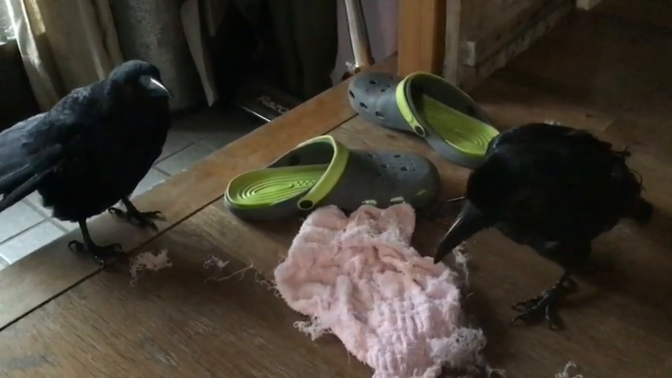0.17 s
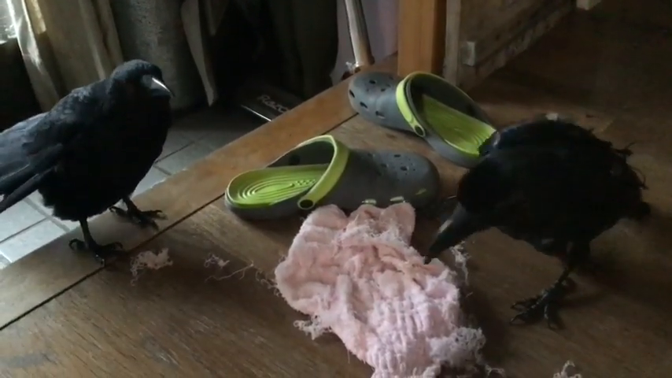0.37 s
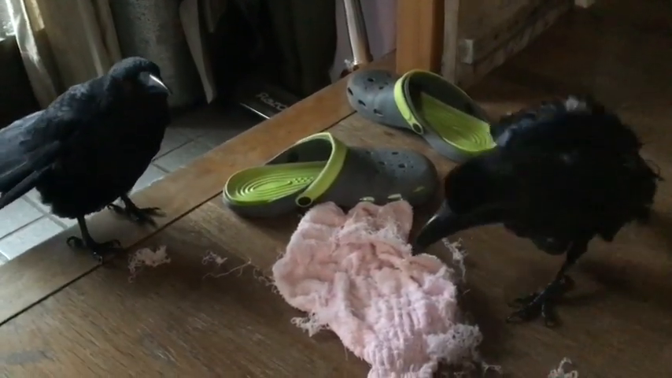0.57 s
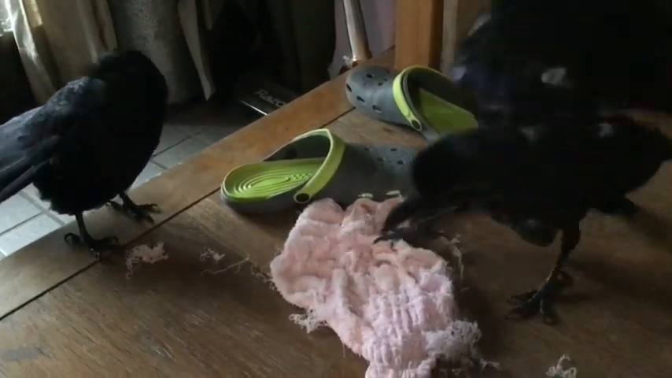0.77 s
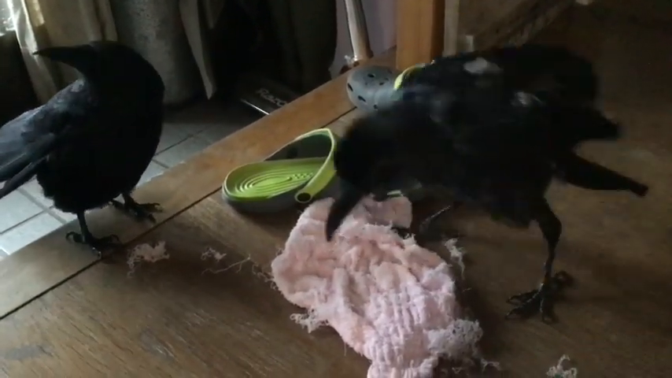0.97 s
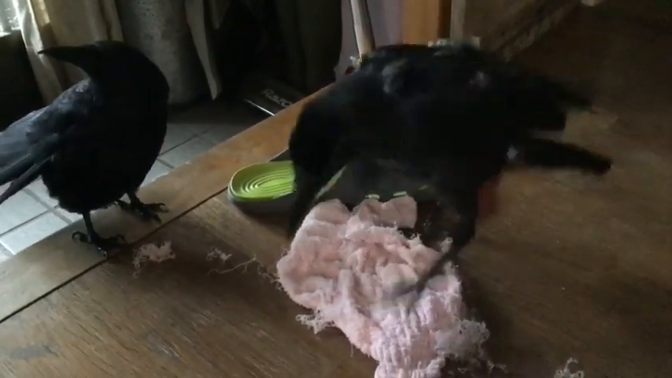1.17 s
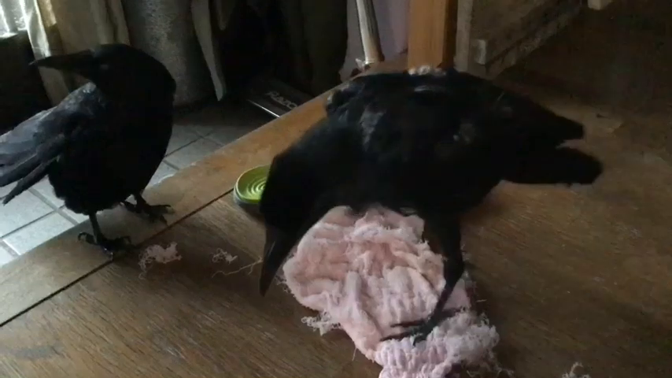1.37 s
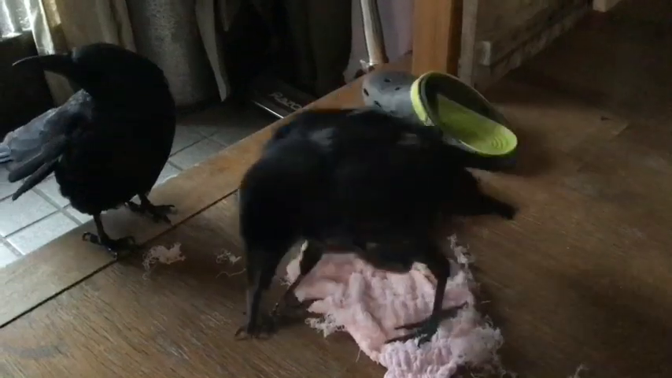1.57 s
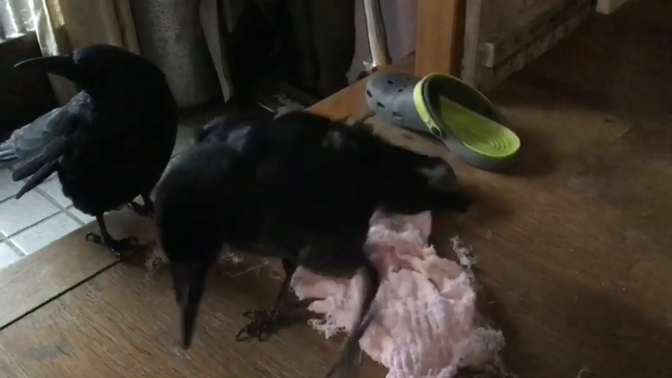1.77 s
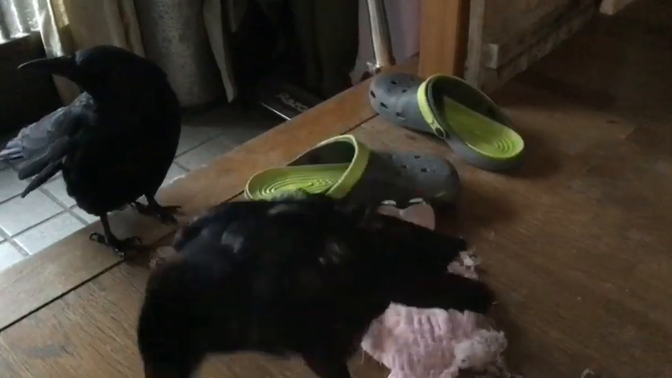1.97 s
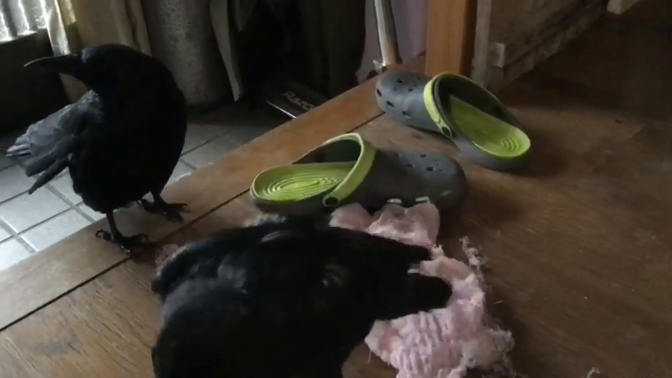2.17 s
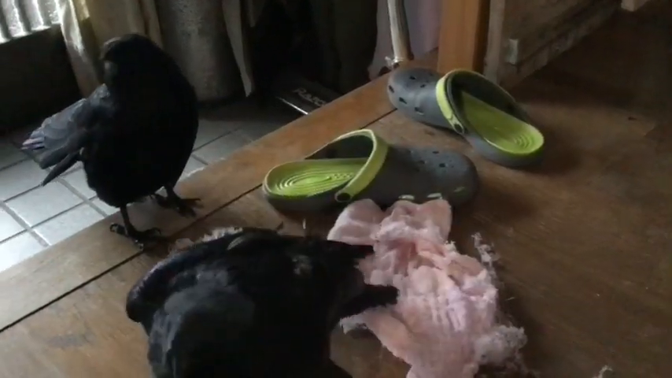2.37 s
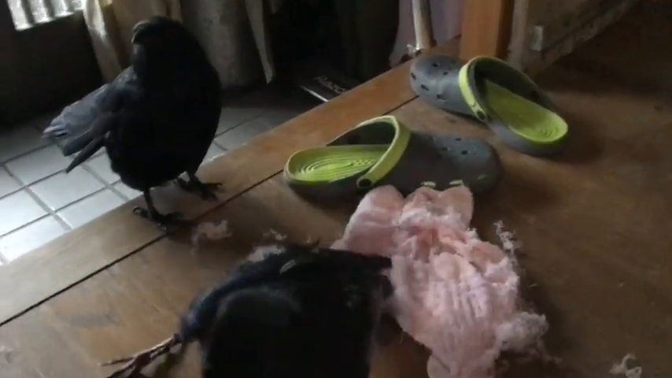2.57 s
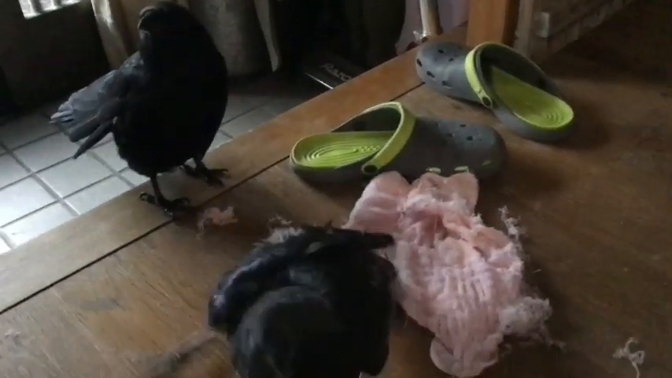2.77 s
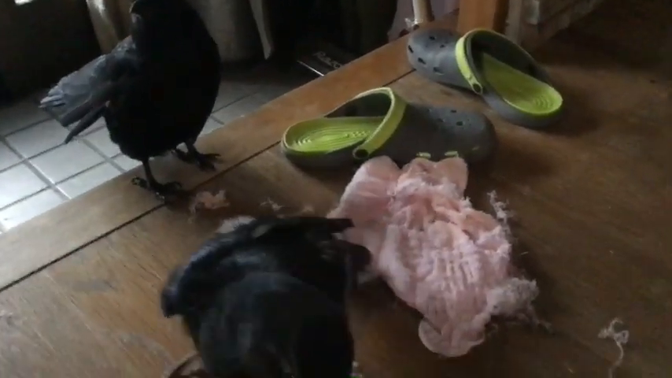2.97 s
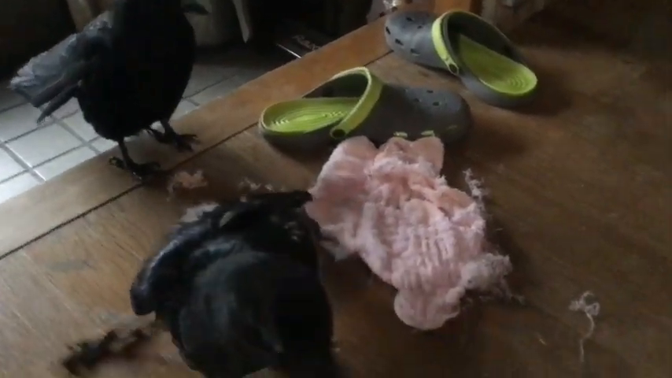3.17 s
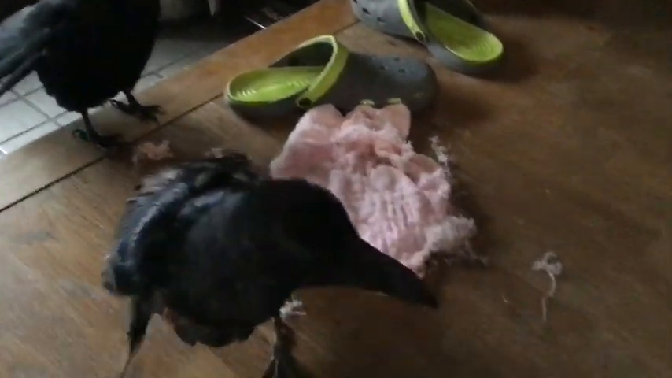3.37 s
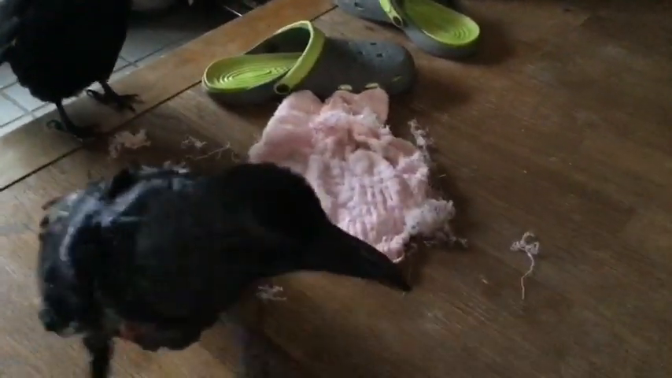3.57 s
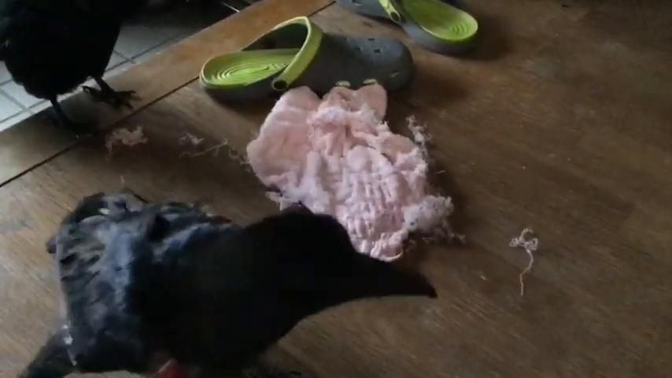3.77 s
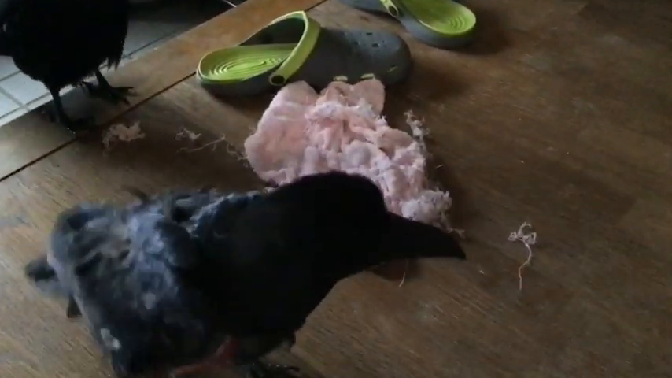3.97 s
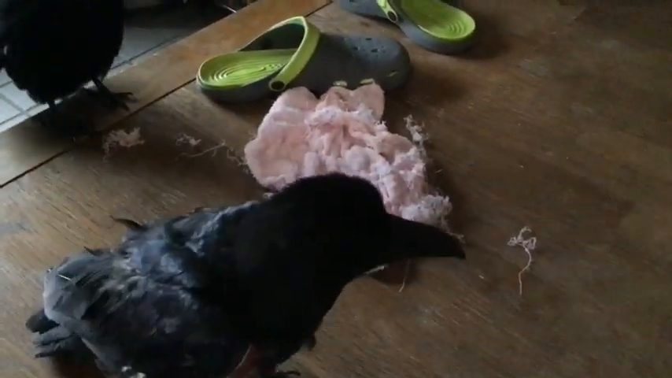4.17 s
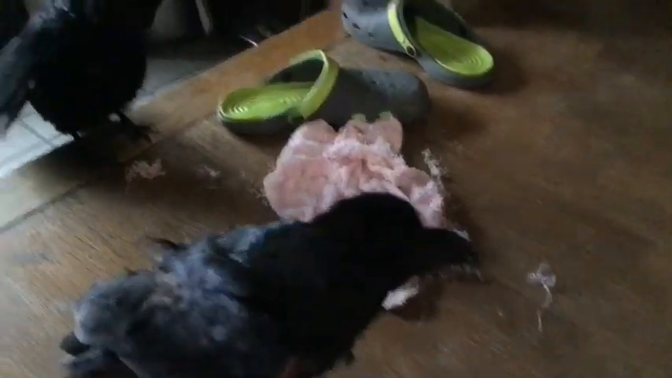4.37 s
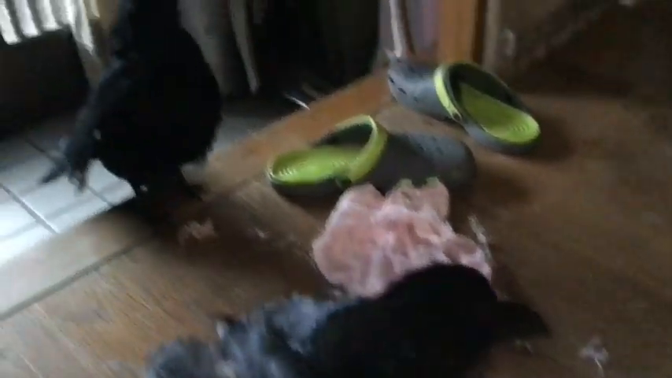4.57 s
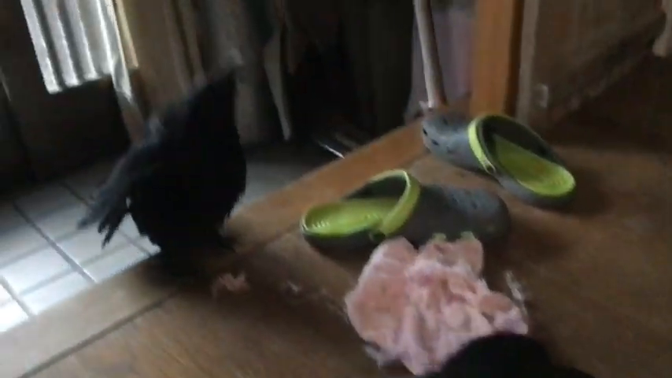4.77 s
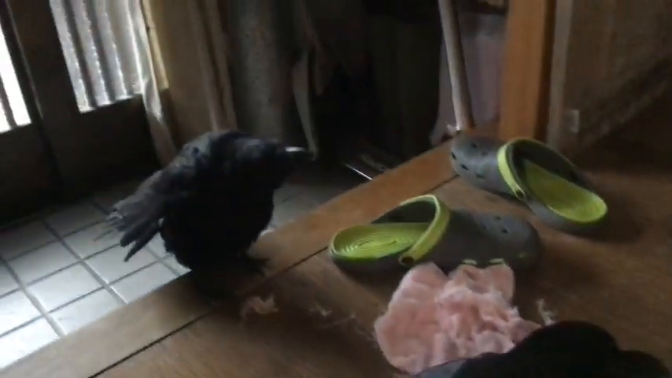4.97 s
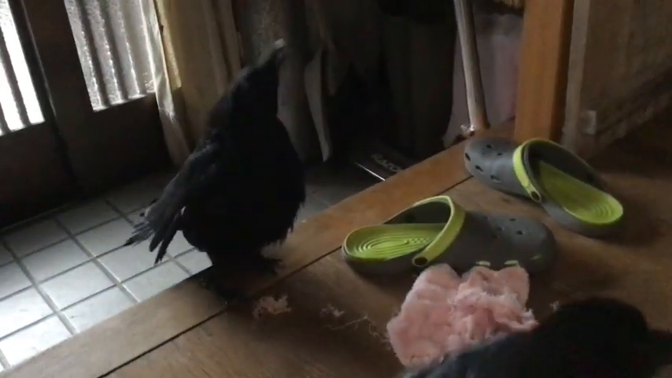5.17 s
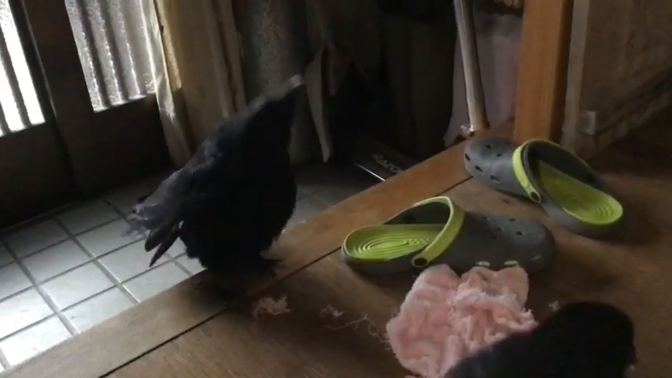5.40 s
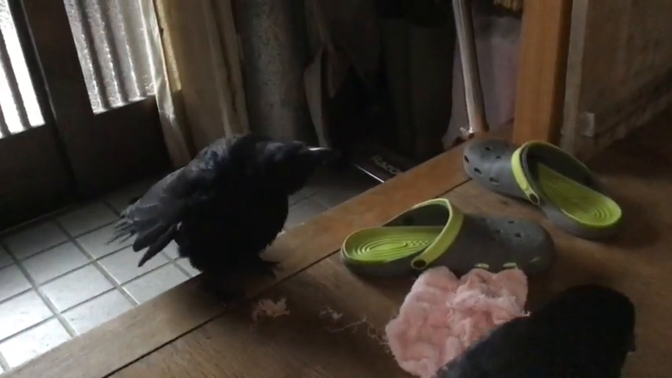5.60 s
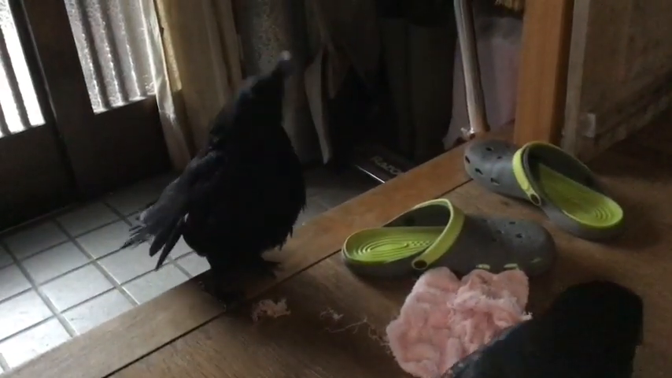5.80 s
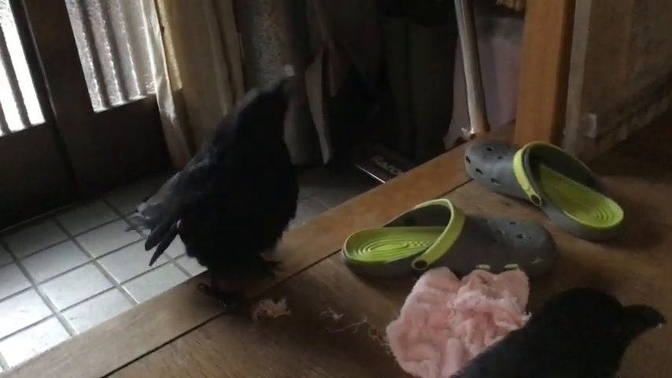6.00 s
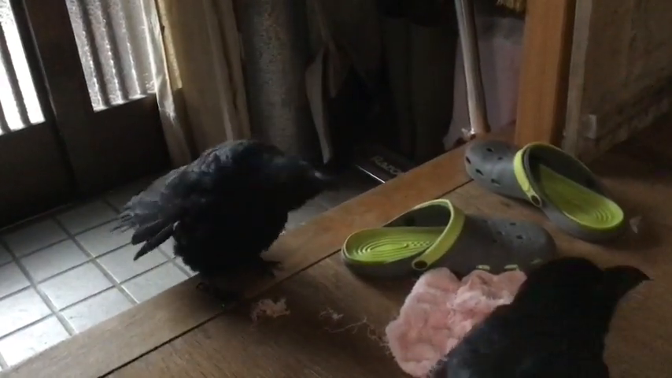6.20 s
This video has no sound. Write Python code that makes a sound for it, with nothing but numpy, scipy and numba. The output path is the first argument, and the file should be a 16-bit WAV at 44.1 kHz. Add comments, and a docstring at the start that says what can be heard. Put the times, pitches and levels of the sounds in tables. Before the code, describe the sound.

In a small wooden entrance hall, a crow walks about, its beak and claws clicking irregularly on the boards while its feathers rustle faintly. A second crow, a little farther off, then gives four loud, harsh, rattling caws at an even pace, each with a short room echo. Soft low thumps come here and there, with a stronger one ending the second caw. The hand-held microphone also picks up still air and a faint hum.

```python
"""A small wooden entrance hall with two crows in it, over still air and a faint mains hum.
The near bird walks about: its feathers rustle by friction, and its beak and claws strike the boards.
The farther one gives four harsh, rattling caws: bursts from the syrinx excite the resonances of
throat and beak, fill the hall with echoes and just overload a hand-held microphone.
Soft low thumps sound here and there, and a stronger one at the end of the second caw."""
import sys
import numpy as np
from scipy import signal
from scipy.fft import rfft, irfft
from scipy.io import wavfile
from scipy.ndimage import uniform_filter1d
from numba import njit

SR = 44100
rng = np.random.default_rng(int(sys.argv[2]) if len(sys.argv) > 2 else 0)


def materialize(psi):
    """Save the field psi as 16-bit PCM at rate SR to the path in sys.argv[1].

    A 1-D psi becomes a single channel; in a 2-D psi each row is a channel.
    """
    bounded = np.clip(np.atleast_2d(psi).T, -1, 1)
    quanta = np.round(bounded * 32767).astype(np.int16)
    wavfile.write(sys.argv[1], SR, quanta)


N = 275184
TIME = np.arange(N) / SR

# The caws. Each row: start and length in seconds, first and settled rattle rate in Hz,
# relative levels of rasp and core in dB, sag of the core in dB per second.
CALLS = [(3.860, .23, 81.08, 59.86, -15, -12.5, 67), (4.493, 0.22, 69.16, 56.91, -14.5, -12.5, 53),
         (5.118, .23, 76.95, 58.3, -15, -12.5, -5), (5.763, 0.23, 75.2, 57.82, -14, -12, 47)]
# Beak and claw taps. Each row: time in seconds, relative levels of click and knock in dB.
IMPACTS = [(0.4335, -46, -58.5), (0.813, -34, -57.5), (1.0252, -32, -57.5), (1.5581, -15, -34.5),
           (1.893, -10, -33), (2.105, -36, -68), (2.2312, -11.5, -38.5), (2.4484, -36.5, -61),
           (2.516, -19.5, -36), (2.8327, -36, -50), (2.8552, -33.5, -58), (3.4351, -18, -47),
           (3.6413, -16.5, -29), (4.4899, -21, -36), (5.0598, -21, -40), (5.5657, -29.5, -49)]
SETTLE_S = 0.0098  # the tip touches first, and the weight follows this much later


def from_db(db):
    """Amplitude grows tenfold with every 20 dB."""
    return 10 ** (np.asarray(db) / 20)


def rms_one(x):
    """Normalisation to unit mean power."""
    return x / np.sqrt(np.mean(x ** 2) + 1e-20)


def at_hz(points, hz):
    """Interpolation along a logarithmic frequency axis."""
    freqs, values = np.transpose(points)
    return np.interp(np.log(np.maximum(hz, 1)), np.log(freqs), values)


def butter(x, hz, kind, order=2):
    """Causal Butterworth filtering, maximally flat in the passband."""
    return signal.sosfilt(signal.butter(order, hz, kind, fs=SR, output="sos"), x + 1e-18)


def colour(x, spectrum, size=4096):
    """Minimum-phase filtering: a folded cepstrum gives a causal response of unit energy."""
    gain = from_db(at_hz(spectrum, np.arange(size // 2 + 1) * SR / size))
    cepstrum = irfft(np.log(gain))
    response = irfft(np.exp(rfft(2 * cepstrum * (np.arange(size) < size // 2))))
    return signal.fftconvolve(x, response / np.linalg.norm(response))[:N]


def wander(hz):
    """Random modulation: low-passed noise of unit power."""
    return rms_one(butter(rng.standard_normal(N), hz, "low"))


def strikes(times, gains):
    """Superposition of ideal impulses, each one sample long."""
    out = np.zeros(N)
    np.add.at(out, np.clip(np.round(np.asarray(times) * SR).astype(int), 0, N - 1), gains)
    return out


def still_air():
    """The noise floor of the house is steady broadband noise, strongest in the bass."""
    # Noise spectrum. Each row: frequency in Hz, relative density in dB.
    spectrum = [(30, -23), (70, -19.5), (100, -8), (125, -12.5), (170, -0.5), (250, -6.5), (400, -8),
                (700, -12), (1000, -11.5), (1600, -17.5), (4000, -25), (11000, -23), (16000, -42)]
    return colour(rng.standard_normal(N), spectrum)


def mains_hum(hz=100):
    """Alternating current gives a pure tone at twice its own frequency."""
    return np.sin(2 * np.pi * hz * TIME)


def echoes(early_db, early_s, tail_db):
    """Reverberation: dense early reflections, then a diffuse tail in which the bass lasts longest."""
    # Decay of the hall. Each row: frequency in Hz, time to fall 60 dB in seconds.
    t60 = [(150, 0.95), (500, 0.34), (1300, 0.39), (2700, 0.39), (5500, 0.33), (10000, 0.3), (15000, 0.3)]
    t = TIME[:SR]
    edges_hz = np.geomspace(100, 17000, 13)
    tail = np.zeros(SR)
    for low, high in zip(edges_hz, edges_hz[1:]):
        decay = from_db(-60 * t / at_hz(t60, np.sqrt(low * high)))
        tail += butter(rng.standard_normal(SR), [low, high], "band") * decay * (t > 0.006)
    early = rng.standard_normal(SR) * np.exp(-t / early_s) * (t > 0.002)
    early *= from_db(early_db) / np.linalg.norm(early)
    return early + from_db(tail_db) * tail / np.linalg.norm(tail)


def hall(x, early_db, early_s, tail_db, bob_hz=3):
    """Reflections depend on source position: a bobbing head passes between two echo patterns."""
    pose = 2 * np.pi * bob_hz * TIME
    return x + sum(signal.fftconvolve(x * share, echoes(early_db, early_s, tail_db))[:N]
                   for share in (np.cos(pose), np.sin(pose)))


def low_thumps(gap_s=0.027, pulse_s=0.0036):
    """Transient response: short, dull pulses ring a steep bass cut and are heard as low thumps."""
    # Low thumps, single or in runs; the strongest comes at the end of the second caw.
    # Each row: start and length in seconds, relative level in dB.
    spans = [(0.196, .01, -42), (.748, .03, -42.5), (2.345, .22, -44.5), (2.624, .06, -41.5),
             (2.741, .035, -39), (2.842, .01, -41.5), (2.92, .06, -38), (3.054, .04, -42),
             (3.32, .085, -42.5), (3.464, .01, -41), (4.719, .01, -25.5), (4.952, .01, -42),
             (5.478, .01, -44.5)]
    events = [(s + SETTLE_S, knock_db - 11) for s, _, knock_db in IMPACTS]  # one with each tap too
    for start, length, db in spans:
        pace, force = rng.standard_normal((2, 12))
        gaps = gap_s * np.exp(0.16 * pace)
        offsets = np.cumsum(gaps) - gaps
        events += zip(start + offsets[offsets < length], db + 5 * force)
    times, db = np.transpose(events)
    lengths = pulse_s * np.exp(0.15 * rng.standard_normal(len(times)))
    pulses = np.cumsum(strikes(times, from_db(db)) - strikes(times + lengths, from_db(db)))
    return butter(butter(pulses, 235, "low"), 135.5, "high", order=7)


def swishes(grain_db=2.5, patchy_db=3.5):
    """Friction noise: feathers and toes slide in short swells of fine, uneven grains."""
    # Rustles, scuffs and wing flicks. Each row: centre and half-width in seconds, relative level in dB.
    slides = [(0.347, .04, -71), (.475, 0.044, -72), (.764, 0.05, -54.5), (1.243, 0.095, -69.5),
              (2.054, 0.018, -49), (2.52, 0.07, -56), (2.755, 0.0084, -48), (3.135, 0.19, -66.5),
              (3.303, 0.013, -41.5), (3.611, 0.029, -47.5), (4.343, 0.014, -46), (4.876, 0.016, -39.5),
              (5.458, 0.024, -45), (6.176, 0.026, -40)]
    # Spectrum of the friction. Each row: frequency in Hz, relative level in dB.
    spectrum = [(710, -46), (1200, -10.5), (1460, -18), (2530, -12.5), (3320, -11), (7570, -8.5),
                (13300, -15.5), (16000, -32)]
    swell = sum(from_db(db) * np.exp(-((TIME - s) / half) ** 2) for s, half, db in slides)
    grains = from_db(grain_db * wander(400) + patchy_db * wander(8.4))
    return swell * rms_one(colour(grains * rng.standard_normal(N), spectrum))


def contact(times, db, grit, grit_s):
    """Impact on a rough surface: an impulse, then an exponentially dying scrape of grit."""
    impact = strikes(times, from_db(db))
    decay = signal.lfilter([1], [1, -np.exp(-1 / (grit_s * SR))], impact + 1e-18)
    return impact + grit * decay * rng.standard_normal(N) / np.sqrt(grit_s * SR / 2)


def taps(knock_lag_s=0.00065):
    """Impact excitation: horn clicks on wood and the board knocks, once for tip and once for weight."""
    # Spectra of the click and of the board. Each row: frequency in Hz, relative level in dB.
    click_spectrum = [(1180, -43), (2000, -2.5), (3490, -11.5), (4230, 1.5), (5780, 2), (6250, 2.5),
                      (9010, 3.5), (12300, 0), (16000, -19.5)]
    board_spectrum = [(40, -51.5), (100, -21.5), (170, -7.5), (300, -8), (450, -0.5), (650, -11.5),
                      (950, -4), (1400, -6.5), (2100, -8.5), (3200, -6.5), (6000, -22.5)]
    tip_s, click_db, knock_db = np.transpose(IMPACTS)
    times = np.append(tip_s, tip_s + SETTLE_S)
    click = contact(times, np.append(click_db, click_db - 11) + 9.5, grit=1.05, grit_s=0.0043)
    knock = contact(times + knock_lag_s, np.append(knock_db - 1, knock_db) + 23, grit=1.08, grit_s=0.0044)
    return butter(colour(click, click_spectrum) + colour(knock, board_spectrum), 92, "high")


@njit
def resonator(x, angle, r):
    """Two-pole resonance of unit peak gain; its moving centre is in radians per sample."""
    y = np.zeros(len(x))
    for i in range(2, len(x)):
        drive = (1 - r * r) / 2 * (x[i] - x[i - 2])
        y[i] = drive + 2 * r * np.cos(angle[i]) * y[i - 1] - r * r * y[i - 2] + 1e-18
    return y


def formants(x, modes, tuning):
    """Resonances act in parallel, each passed twice so that the valleys between them stay deep."""
    out = np.zeros(N)
    for hz, width, db in modes:
        angle, r = 2 * np.pi * hz * tuning / SR, np.exp(-np.pi * width / SR)
        out += from_db(db) * resonator(resonator(x, angle, r), angle, r)
    return out


def even(x, size=1500):
    """Compression: division by the running amplitude evens the level over a couple of bursts."""
    power = np.maximum(uniform_filter1d(uniform_filter1d(x ** 2, size), size), 0)
    return x / np.sqrt(power + np.mean(x ** 2) / 2)


def effort(top_db, slope_db_per_s, onset_db, attack_s, bend, release_s=0.045, release_db=10.5):
    """The bird's push sets each caw's envelope in dB: easing attack, sloping hold, short release."""
    start, length = np.transpose(CALLS)[:2]
    caw = np.maximum(np.searchsorted(start - release_s, TIME) - 1, 0)
    age = np.clip(TIME - start[caw], 0, length[caw])
    attack = onset_db * np.maximum(1 - age / attack_s, 0) ** bend
    hold = (slope_db_per_s * np.ones(len(CALLS)))[caw] * np.maximum(age - attack_s, 0)
    release = release_db * np.maximum(1 - (length[caw] - age) / release_s, 0)
    return top_db[caw] - attack + hold - release


def rattle_times(jitter_s=0.0002, slowing_bursts=7):
    """Pulsed airflow: the syrinx opens in bursts that slow at first and then keep their pace."""
    times = []
    for start, length, first_hz, settled_hz, *_ in CALLS:
        gaps = np.interp(np.arange(20), [0, slowing_bursts], [1 / first_hz, 1 / settled_hz])
        offsets = np.cumsum(gaps) - gaps
        times.extend(start + offsets[offsets < length])
    return np.array(times) + jitter_s * rng.standard_normal(len(times))


def beak_tuning(spread=0.00407):
    """Frequency modulation: the beak opens and closes in every caw, never quite alike."""
    # The beak's gesture. Each row: fraction of the call, factor on pitch and resonances.
    gesture = [(0, .91), (0.299, .985), (0.599, 1.01), (1, .99)]
    share, factor = np.transpose(gesture)
    times = np.concatenate([start + share * length for start, length, *_ in CALLS])
    return np.interp(TIME, times, np.tile(factor, len(CALLS))) * (1 + spread * wander(8.34))


def ringing_core(bursts, pitch_hz, waver=0.00908, lag_s=0.0082, half_width_s=0.0052):
    """A harmonic series: the throat sings on the third partial, swelling just after each burst."""
    # Partials of the core. Each row: multiple of the pitch, relative level in dB.
    harmonics = [(1, -27.5), (2, -23.5), (3, 1.5)]
    phase = 2 * np.pi * np.cumsum(pitch_hz * (1 + waver * wander(55))) / SR
    swell = np.exp(-((TIME[:SR // 20] - lag_s) / half_width_s) ** 2)
    gate = signal.fftconvolve(strikes(bursts, 1), swell)[:N]
    return gate * sum(from_db(db) * np.sin(k * phase) for k, db in harmonics)


def syrinx(bursts, stretch, pitch_hz, jitter, decay_s, rough):
    """Damped oscillation: membranes slap five times a burst, ever weaker, and pass turbulent air."""
    gaps = (1 + jitter * rng.standard_normal((len(bursts), 5))) / pitch_hz
    delay = np.cumsum(gaps, axis=1) - gaps[:, :1]
    lasting_s = decay_s * np.interp(bursts, TIME, stretch)
    slaps = strikes((bursts[:, None] + delay).ravel(), np.exp(-delay / lasting_s[:, None]).ravel())
    latest = np.maximum(np.searchsorted(bursts, TIME) - 1, 0)
    age = TIME - bursts[latest]
    airflow = (age > 0) * np.exp(-np.minimum(np.abs(age) / lasting_s[latest], 20))
    return rms_one(slaps) + rough * rms_one(airflow * rng.standard_normal(N))


def caws(pitch_hz=417):
    """Source and filter: bursts carry a pitched core, a rasp from the throat and a hiss from the beak."""
    # Resonances. Each row: centre before tuning in Hz, bandwidth of one pass in Hz, relative gain in dB.
    throat_modes = [(424.5, 120, -12), (875, 172, 2.5), (1260, 327, 6.5), (1441, 160, 1.5),
                    (1772, 208, 3.5), (2083, 160, 3), (2607, 224, 1), (2846, 207, 2), (2990, 48, -13),
                    (4100, 9900, -34.5)]
    beak_modes = [(5397, 340, 5), (5860, 790, 3.5), (7170, 1720, 1), (8240, 1800, -3), (8820, 2100, -8.5),
                  (10230, 620, -7.5), (12400, 1500, -17.5)]
    rasp_top_db, core_top_db, sag_db_per_s = np.transpose(CALLS)[4:]
    rasp_db = effort(rasp_top_db, slope_db_per_s=26.5, onset_db=18, attack_s=0.063, bend=1.6)
    core_db = effort(core_top_db, -sag_db_per_s, onset_db=26, attack_s=0.077, bend=1.02)
    bursts, tuning = rattle_times(), beak_tuning()
    stretch = from_db(0.37 * (rasp_db - rasp_db.max()))  # gentle bursts are short, separate clacks
    core = even(ringing_core(bursts, pitch_hz * tuning)) * from_db(core_db - 0.4)
    buzz = syrinx(bursts, stretch, pitch_hz, jitter=0.091, decay_s=0.0033, rough=0.63)
    breath = syrinx(bursts, stretch, pitch_hz, jitter=0.2, decay_s=0.0076, rough=2.6)
    rasp = even(formants(buzz, throat_modes, tuning)) * from_db(rasp_db - 3)
    # The beak's resonances sweep farther than the throat's, and its hiss grows faster with effort.
    hiss = even(formants(breath, beak_modes, tuning ** 1.2)) * from_db(1.395 * rasp_db - 3)
    return core, rasp + hiss


def scene():
    """Superposition at the microphone: both crows with their echoes, the background and the thumps."""
    walker = taps() + from_db(3.5) * swishes()
    near = hall(walker, early_db=-4.5, early_s=0.0069, tail_db=-6)
    core, hoarse = caws()
    far = hall(core, early_db=-16.5, early_s=0.018, tail_db=-12.5)
    far += hall(hoarse, early_db=-1.5, early_s=0.009, tail_db=-4)
    background = from_db(-63.5) * still_air() + from_db(-70.5) * mains_hum()
    return (background + from_db(11) * low_thumps() + near + from_db(0.85) * far)[None]


def record(dry):
    """Overload and band limiting: the loudest peaks clip, and a steep low-pass cuts above 16 kHz."""
    clipped = np.clip(dry, -0.93, 0.93)
    return signal.sosfilt(signal.ellip(10, 0.1, 80, 16000, fs=SR, output="sos"), clipped)


dry = scene()
out = record(dry)
materialize(out)
```